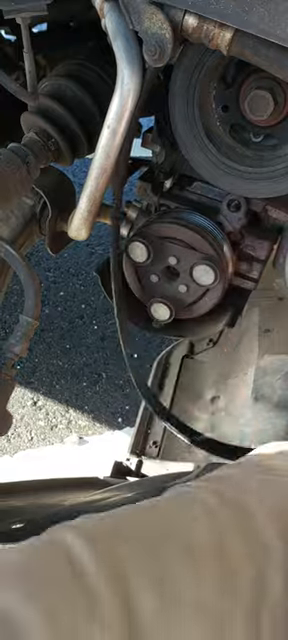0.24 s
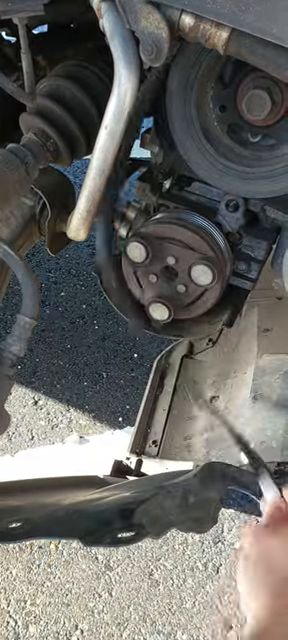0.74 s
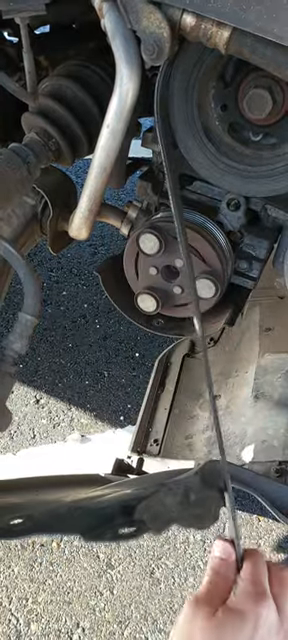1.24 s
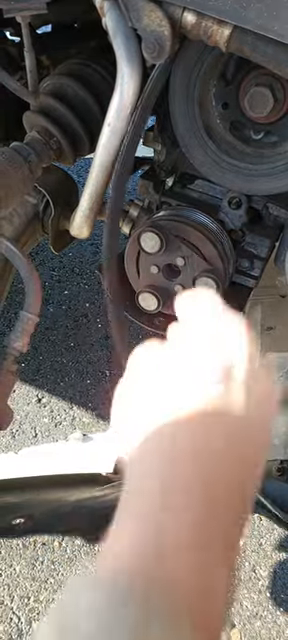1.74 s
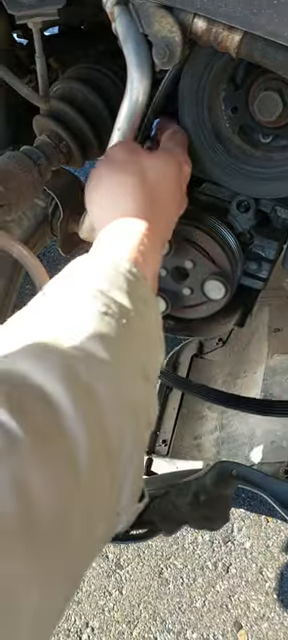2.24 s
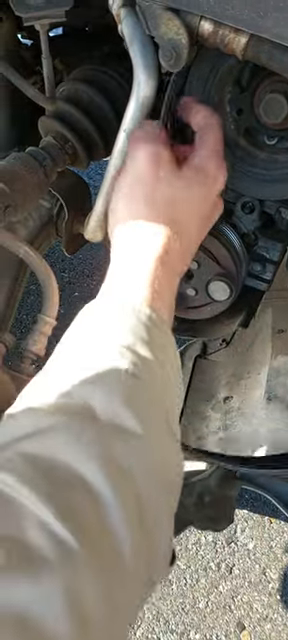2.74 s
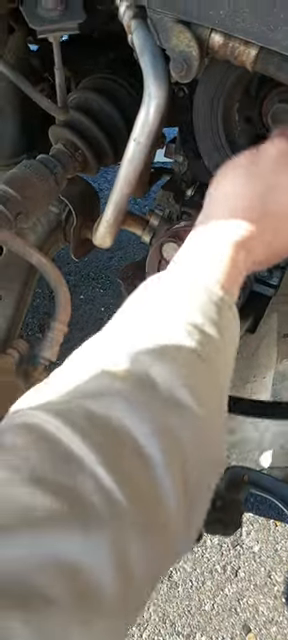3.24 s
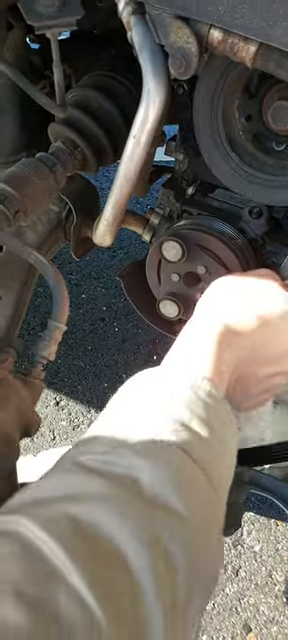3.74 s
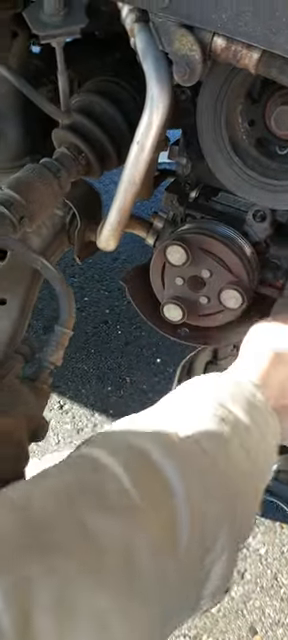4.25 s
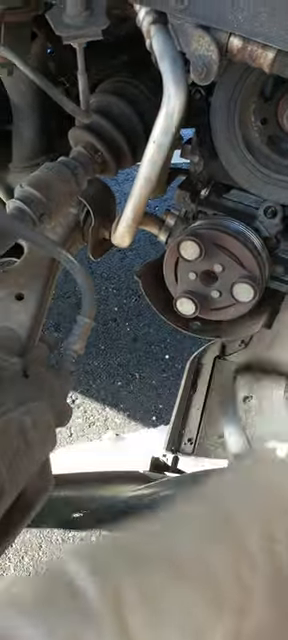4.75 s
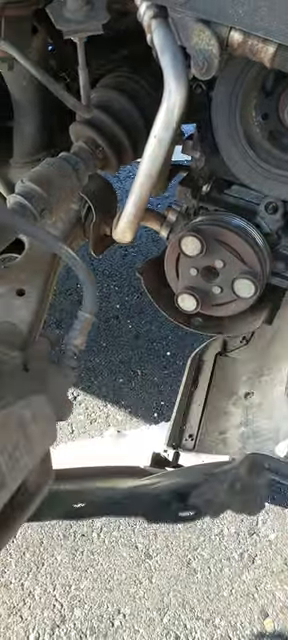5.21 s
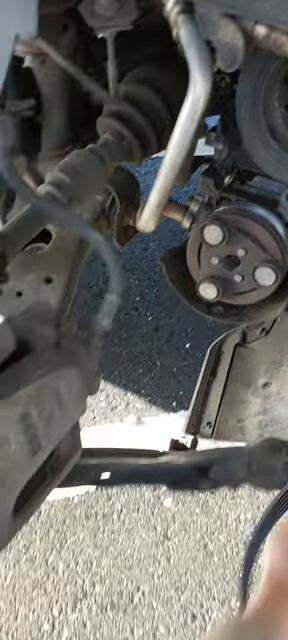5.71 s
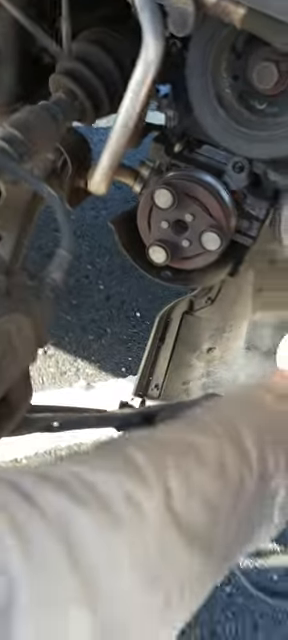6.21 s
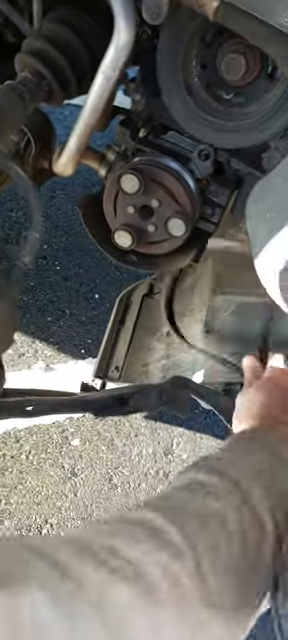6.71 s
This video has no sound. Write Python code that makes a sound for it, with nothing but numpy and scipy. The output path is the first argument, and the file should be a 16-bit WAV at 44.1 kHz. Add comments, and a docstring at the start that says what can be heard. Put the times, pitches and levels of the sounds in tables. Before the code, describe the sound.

Irregular handling noise, dry and close in open air: cloth brushing, rubber scuffing, boxy knocks and a few bright metal ticks. Early slaps come in small clusters, then lighter rustling, a strong thud near the middle, a busy rattling drag after five seconds, and a last pair of hard knocks. Faint air and a distant idling-like hum continue quietly underneath.

```python
"""A rubber drive belt is worked off its pulleys by hand, under a car parked outdoors.
The belt slaps, flaps, drags and scuffs on a loose plastic splash tray and clicks on the metal around it:
short bursts and uneven pushes set the tray and the metal ringing.
A sleeve rustles close to the microphone as coloured noise that comes and goes in strokes.
Behind it are a rumble, faint air and a low hum of unsteady tones, like an engine idling some way off."""
import sys
import numpy as np
from scipy import signal
from scipy.fft import rfft, irfft, next_fast_len
from scipy.io import wavfile
from scipy.ndimage import uniform_filter1d, map_coordinates

SR = 44100
rng = np.random.default_rng(int(sys.argv[2]) if len(sys.argv) > 2 else 0)


def unload_audio(sound):
    """Save the sound as a 16-bit wav file, at the path given as the first command line argument."""
    columns = np.transpose(np.atleast_2d(sound))
    # keep every value between -1 and 1, then stretch to whole-number steps
    steps = np.round(np.clip(columns, -1, 1) * 32767)
    wavfile.write(sys.argv[1], SR, steps.astype(np.int16))


N = 307369  # length in samples

# Notes the splash tray rings with: pitch_hz [Hz], relative_level_db [dB], time_to_fall_60_db_s [s]
TRAY_MODES = [(64.7, 1, 0.2), (81.3, 0, 0.097), (117.3, 2, 0.22), (147, 5.5, 0.13), (214.4, 2, 0.15),
              (258.8, 2, 0.15), (273, -2, 0.28), (310, 0.5, 0.2), (355.6, -4, 0.12), (413.5, -0.5, 0.19),
              (452.5, -2.5, 0.15), (516.6, -0.5, 0.13), (564.6, -10, 0.25), (672, -15, 0.27),
              (760, -8, 0.12)]
# Hard resonances of belt and brackets: pitch_hz [Hz], width_hz [Hz], relative_level_db [dB]
BRACKET_PEAKS = [(548, 117, 9), (828, 200, 5), (1093, 101, 3.5), (1332, 93, 2.5), (1672, 202, 1.5),
                 (1854, 110, 5.5), (2170, 256, -0.5), (2610, 85, 6.5), (2680, 386, -1), (3280, 186, -0.5),
                 (4500, 110, -23), (5340, 500, -7.5), (9700, 1100, -50)]
# Colour of a rubber snap: frequency_hz [Hz], relative_level_db [dB per Hz]
SNAP_COLOUR = [(1500, 7), (3500, 3.5), (5200, 4.5), (7200, -8.5), (9800, -1), (12000, -18), (16000, -46)]


def amp(db):
    """Turn decibels into a gain."""
    return 10 ** (np.asarray(db) / 20)


def unit(x):
    """Scale a sound to an rms level of 1."""
    return x / np.sqrt(np.mean(x ** 2) + 1e-20)


def peak_one(x):
    """Scale a sound to a peak of 1."""
    return x / (np.abs(x).max() + 1e-20)


def along(points, hz):
    """Read a curve of (Hz, value) points, with pitch on a log scale."""
    point_hz, values = np.transpose(points)
    return np.interp(np.log(hz + 1), np.log(point_hz), values)


def curves(rows):
    """Join the rows of a timed table into one value per sample for each column after the time."""
    times, *columns = np.transpose(rows)
    return [np.interp(np.arange(N) / SR, times, column) for column in columns]


def wobble(rate):
    """Draw a smooth random curve through `rate` random points a second."""
    knots = rng.standard_normal(int(N * rate / SR) + 4)
    grid = np.arange(0, len(knots), .125)
    smooth = map_coordinates(knots, [grid])
    return np.interp(np.arange(N) * (rate / SR), grid, smooth)


def filtered(x, response):
    """Multiply the spectrum of a sound by a response, which may also shift phase."""
    size = x.shape[-1]
    padded = next_fast_len(size + 4096, real=True)
    hz = np.fft.rfftfreq(padded, 1 / SR).astype(np.float32)
    gain = np.asarray(response(hz), np.complex64)
    return irfft(rfft(x.astype(np.float32), padded) * gain, padded)[..., :size]


def resonate(x, peaks):
    """Shake a bank of (Hz, width, dB) resonances with a sound."""
    # neighbours take opposite signs
    bank = [(float(c), float(w), (-1) ** k * float(amp(db))) for k, (c, w, db) in enumerate(peaks)]
    return filtered(x, lambda f: sum(g * 1j * w * f / (c * c - f * f + 1j * w * f) for c, w, g in bank))


def pair(size):
    """Make white noise for both microphone ports, alike in the bass and nearly unrelated in the treble."""
    # Likeness of the ports: frequency_hz [Hz], likeness [1 = the same, 0 = unrelated]
    likeness = [(60, 0.8), (300, 0.7), (700, 0.25), (2000, -0.16), (6000, -0.12), (14000, 0)]

    def shares(hz):
        angle = np.arccos(np.clip(along(likeness, hz), -1, 1)) / 2
        return np.array([np.cos(angle), np.sin(angle)])

    mid, side = filtered(rng.standard_normal((2, size)), shares)
    return np.array([mid + side, mid - side])


def rush(spectrum):
    """Make coloured stereo noise with an rms level of 1."""
    return unit(filtered(pair(N), lambda hz: amp(along(spectrum, hz))))


def fade(t, t60):
    """Die away smoothly, by 60 dB in t60 seconds."""
    return np.exp(-np.log(1000) * t / np.maximum(t60, 1e-3))


def favour(hz, centre_hz, octaves):
    """A contact excites most strongly the modes near its own pitch."""
    return np.exp(-.5 * (np.log2(hz / centre_hz) / octaves) ** 2)


def excited(peaks, centre_hz, octaves, rest):
    """Reweight resonances for one contact; far ones keep a small share."""
    return [(hz, width, db + 20 * np.log10(favour(hz, centre_hz, octaves) + abs(rest)))
            for hz, width, db in peaks]


def tray_peaks():
    """Give the tray's modes as (Hz, width, dB) resonances; a longer ring means a narrower peak."""
    return [(hz, np.log(1000) / np.pi / t60, db) for hz, db, t60 in TRAY_MODES]


def ring(modes, centre_hz, octaves, attack, port_spread):
    """One blow sets fading sine tones going, each at a slightly new strength."""
    t = np.arange(SR // 4, dtype=np.float32) / SR
    hz, db, t60 = np.transpose(modes)[:, :, None]
    gain = amp(db + 2 * rng.standard_normal(hz.shape)) * favour(hz, centre_hz, octaves)
    phase = 2 * np.pi * rng.random(hz.shape)
    phase = phase + port_spread * rng.standard_normal((2, *hz.shape))  # the ports differ
    gain, turn, damping, phase = map(np.float32, (gain, 2 * np.pi * hz, np.log(1000) / t60, phase))
    tones = gain * np.exp(-damping * t) * np.sin(turn * t + phase)
    return peak_one(np.sum(tones, axis=1) * (1 - np.exp(-t / attack)))


def slips(rate, scatter, spread_db):
    """Stick and slip: pushes of uneven size at an uneven rate, about `rate` a second."""
    turns = np.cumsum(rate * np.exp(scatter * wobble(rate))) / SR
    pushes = np.diff(np.floor(turns), prepend=0)  # one push each time the count goes up
    return pushes * amp(spread_db * wobble(rate))


def patchy(x, depth_db):
    """Vary the gain in slow random patches over time and frequency."""
    z = signal.stft(x, nperseg=512)[2]
    field = uniform_filter1d(rng.standard_normal(z.shape[1:]), size=9, axis=0)
    field = uniform_filter1d(field, size=9, axis=1)
    return unit(signal.istft(z * amp(depth_db * unit(field)), nperseg=512)[1][:, :N])


def add(track, s, sound):
    """Mix a sound into the track at time s."""
    part = track[:, max(round(s * SR), 0):][:, :sound.shape[1]]
    part += sound[:, :part.shape[1]]


def outdoors():
    """Sine tones make a slightly unsteady hum that swells with the distant rumble; noise makes faint air."""
    # Hum tones: pitch_hz [Hz], rms_level_db [dB before flutter and swell]
    hum_tones = [(66, -49.5), (102.3, -50), (111, -53.5), (172.3, -46), (204.6, -64), (279.9, -52),
                 (344.5, -64)]
    # Colour of the rumble: frequency_hz [Hz], relative_level_db [dB per Hz]
    rumble_colour = [(20, -16.5), (55, -0.5), (110, 0.5), (170, -3), (300, -15.5), (450, -23.5), (650, -42),
                     (1500, -58)]
    # Colour of the air: frequency_hz [Hz], relative_level_db [dB per Hz]
    air_colour = [(300, 5), (700, 5.5), (1400, 4.5), (2900, 5), (4000, -13), (8000, -4.5), (16000, -15)]
    # Rise and fall of the rumble: time_s [s], level_db [dB before lift and wobble]
    rumble_levels = [(0.0, -44), (0.7, -42.5), (1.38, -48), (4.13, -38.5), (4.27, -40.5), (6.62, -42.5),
                     (6.97, -38.5)]
    phase_waver, flutter_db = 0.63, 2  # unsteadiness of each tone: radians, dB
    rumble_lift_db, air_db = 1, -66.5
    hum_follows = 0.56  # share of the rumble's swell, in dB, that the hum follows

    t = np.arange(N) / SR
    rumble_db, = curves(rumble_levels)
    hum = np.zeros((2, N))
    for hz, db in hum_tones:
        phase = 2 * np.pi * hz * t + phase_waver * wobble(7)
        phase = phase + .3 * rng.standard_normal((2, 1))  # the ports differ
        hum += amp(db + flutter_db * wobble(4)) * np.sqrt(2) * np.sin(phase)
    swell = amp(hum_follows * (rumble_db - rumble_db.mean()))
    rumble = amp(rumble_db + rumble_lift_db + wobble(2.99)) * rush(rumble_colour)
    return swell * hum + rumble + amp(air_db) * rush(air_colour)


def stroke_gains():
    """Gains of rub and hiss: most strokes swell and sink; the last is still swelling when it is let go."""
    # Strokes of sleeve and belt: start_s [s], swells_until_s [s; after end_s in the last row],
    # end_s [s], rub_db and hiss_db [relative dB at the top of the swell]
    strokes = [(0.474, 0.585, 0.81, -43.5, -53), (0.87, 0.89, 1.13, -57.5, -61),
               (1.559, 1.737, 2.01, -51.5, -57.5), (2.29, 2.38, 2.43, -61.5, -58),
               (2.568, 2.629, 2.8, -87, -63), (2.87, 2.923, 3.12, -61, -60.5),
               (3.155, 3.198, 3.35, -60, -60), (3.423, 3.521, 3.72, -50.5, -55.5),
               (3.757, 3.908, 4.45, -52, -64), (4.108, 4.272, 4.76, -81, -62),
               (4.46, 4.835, 4.865, -47.5, -56.5), (4.987, 5.016, 5.17, -44, -60),
               (5.226, 5.278, 5.38, -39, -58), (5.436, 5.64, 5.67, -50, -57),
               (5.693, 5.734, 5.82, -51, -57.5), (5.896, 5.916, 6.04, -56.5, -53),
               (6.188, 6.215, 6.76, -58, -62.5), (6.499, 6.644, 6.89, -44.5, -57),
               (6.839, 6.895, 6.87, -43, -59.5)]
    grip_s, release_s = 0.077, 0.16  # times over 60 dB: quick to come in, slower to die away
    rub_sag_db, hiss_sag_db = 13, 8  # how far the ends of a stroke lie below the top of its swell
    rest_rub_db, rest_hiss_db = -70, -80.5  # cloth still stirs between strokes

    t = np.arange(N) / SR
    rub_power = np.full(N, amp(rest_rub_db) ** 2)
    hiss_power = np.full(N, amp(rest_hiss_db) ** 2)
    for start, swells_until, end, rub_db, hiss_db in strokes:
        on = (t > start - grip_s) & (t < end + release_s)
        coming_in = fade(np.maximum(start - t[on], 0), grip_s)
        dying_away = fade(np.maximum(t[on] - end, 0), release_s)
        contact = coming_in * dying_away
        sag = np.interp(t[on], [start, swells_until, end], [1, 0, 1])
        rub_power[on] += (contact * amp(rub_db - rub_sag_db * sag)) ** 2
        hiss_power[on] += (contact * amp(hiss_db - hiss_sag_db * sag)) ** 2
    return np.sqrt(rub_power), np.sqrt(hiss_power)


def sliding():
    """Cloth and rubber rub in grainy strokes under a fluttering hiss; the belt catches, the sleeve crackles."""
    # Colour of the rub: frequency_hz [Hz], relative_level_db [dB per Hz]
    rub_colour = [(150, -3.5), (430, 11), (700, -9.5), (1080, -3.5), (1550, -10.5), (1880, -3), (2300, -5),
                  (2900, -7), (3900, -15.5), (7000, -35)]
    # Colour of the hiss: frequency_hz [Hz], relative_level_db [dB per Hz]
    hiss_colour = [(1500, 4), (3800, 3.5), (5300, 2), (7200, -0.5), (9500, 0.5), (12000, -3), (16000, -7)]
    catch_db, crackle_db = -12, -11.5  # catches against the rub, crackles against the hiss

    rub_gain, hiss_gain = stroke_gains()
    pressure, flutter = amp(1.5 * wobble(35)), amp(1.3 * wobble(22))
    grain = unit(slips(rate=350, scatter=.7, spread_db=3)) + pair(N)
    catches = unit(slips(rate=7, scatter=.7, spread_db=3))  # tiny catches of the belt
    folds = slips(rate=12, scatter=.7, spread_db=4)  # folds of the sleeve
    rub = rush(rub_colour) + amp(-5.5) * unit(resonate(grain, BRACKET_PEAKS))  # part rings in the brackets
    caught = unit(resonate(catches, tray_peaks() + BRACKET_PEAKS))
    rub = 1.225 * patchy(rub, depth_db=2.5) + amp(catch_db) * caught
    # each fold swells the hiss, then dies away by 60 dB in 0.029 s
    crackle = unit(signal.lfilter([1], [1, -fade(1 / SR, 0.029)], folds))
    # the colour of the hiss shifts as the cloth moves
    hiss = patchy(rush(hiss_colour), depth_db=3) * (flutter + amp(crackle_db) * crackle)
    return pressure * (amp(3) * rub_gain * rub + amp(2) * hiss_gain * hiss)


def clicks():
    """Hard taps on metal: a short crack of noise and a quickly damped ring."""
    # Notes of the pulley metal: pitch_hz [Hz], relative_level_db [dB], time_to_fall_60_db_s [s]
    metal_modes = [(1389, -10, .04), (1965, -7, .04), (2290, -6, .035), (2480, -4, .035), (2900, -6, .03),
                   (3270, -3, .03), (3461, 0, .035), (3575, -2, .04), (4430, -17, .04), (5060, -15, .04),
                   (5464, -19, .045)]
    # Taps on metal: start_s [s], note_peak_db [dB], brightness_centre_hz [Hz]
    taps = [(0.844, -29, 1930), (0.8779, -17.5, 3670), (5.6275, -15, 2350), (6.566, -28, 2280)]
    # Colour of a metal crack: frequency_hz [Hz], relative_level_db [dB per Hz]
    crack_colour = [(400, -8), (1100, -4), (2300, 2.5), (3300, -1.5), (4000, -9.5), (5300, -3), (7000, -23),
                    (10000, -15), (15000, -55)]

    out, t = np.zeros((2, N)), np.arange(SR // 4) / SR
    for s, db, hz in taps:
        burst = pair(len(t)) * (fade(t, 0.02) + amp(-1.5) * fade(t, 0.094))
        crack = filtered(burst, lambda f: amp(along(crack_colour, f)))
        note = ring(metal_modes, hz, octaves=0.31, attack=0.00035, port_spread=0.63)
        add(out, s, amp(db) * note + amp(db - 1.0) * peak_one(crack))
    return out


def scuffs():
    """Short grainy scuffs of the belt, and one faint, high flick of the sleeve, ring and rasp."""
    # Scuffs, with the sleeve's flick at 6000 Hz: middle_s [s], relative_level_db [dB],
    # length_s [s from the middle until the gain falls to 0.14], pitch_hz [Hz]
    scuff_list = [(3.606, -47.5, 0.023, 1890), (4.14, -34, 0.013, 325), (4.623, -42, 0.041, 402),
                  (4.809, -35.5, 0.0096, 424), (4.854, -37, .017, 1800), (5.104, -29, 0.02, 2800),
                  (5.145, -25, .011, 2000), (5.169, -35, .013, 2180), (5.605, -33.5, 0.035, 442),
                  (5.732, -40.5, .069, 557), (5.736, -37.5, 0.031, 2300), (6.246, -40.5, 0.016, 414),
                  (6.376, -59, 0.0072, 6000), (6.711, -43.5, 0.019, 2460), (6.913, -45, .037, 397)]

    out, t = np.zeros((2, N)), np.arange(SR // 4) / SR
    force = unit(slips(rate=600, scatter=.6, spread_db=3.5)) + 1.0 * pair(N)
    for s, db, length, hz in scuff_list:
        grains = force[:, rng.integers(N - len(t)):][:, :len(t)]
        peaks = excited(tray_peaks() + BRACKET_PEAKS, hz, octaves=0.45, rest=0.026)
        body = unit(resonate(grains, peaks))
        rasp = unit(filtered(grains, lambda f: amp(along(SNAP_COLOUR, f))))
        sound = body + amp(-7.5) * hz / 2500 * rasp  # higher scuffs rasp more
        swell = np.exp(-2 * ((t - t.mean()) / length) ** 2)
        add(out, s - t.mean(), amp(db - 1.0) * sound * swell)
    return out


def drag():
    """The belt judders over the tray in stick and slip, shaking it and the brackets."""
    # Dragging over the tray: time_s [s], judder_db and rasp_db [relative dB]
    drag_levels = [(5.2, -29, -48), (5.28, -25, -47), (5.36, -22, -43.5), (5.425, -32.5, -74)]

    judder_db, rasp_db = curves(drag_levels)
    t = np.arange(N) / SR
    touching = 1. * ((t > drag_levels[0][0]) & (t < drag_levels[-1][0]))
    touching = uniform_filter1d(touching, size=300)  # soften the start and end
    force = unit(slips(rate=110, scatter=.5, spread_db=2.5)) + .35 * pair(N)
    # higher tray notes gain 2 dB per octave
    tray = [(hz, width, db + 2 * np.log2(hz / 300)) for hz, width, db in tray_peaks()]
    judder = unit(resonate(force, tray))
    brackets = excited(BRACKET_PEAKS, 790, octaves=0.63, rest=0.11)
    rasp = unit(resonate(force * amp(3 * wobble(45)), brackets))
    return touching * (amp(judder_db - 4.0) * judder + amp(rasp_db + 7) * rasp)


def thumps():
    """Low thumps of the tray, most under the hardest slaps, ring its lower notes; it springs back after each."""
    # Low thumps: start_s [s], relative_level_db [dB], pitch_hz [Hz]
    thump_list = [(0.566, -16.5, 130), (0.763, -28, 83.5), (1.015, -30, 130), (1.764, -14.5, 92.6),
                  (2.774, -23.5, 110), (3.557, -26.5, 79.5), (3.914, -8.5, 79), (3.918, -18, 214.6),
                  (4.132, -13, 65.5), (5.277, -24, 85), (5.336, -18.5, 69), (5.639, -18.5, 135),
                  (5.923, -28.5, 123.2), (6.595, -14.5, 84)]
    rebound_s, rebound_db, rebound_pitch = 0.0231, -5, 0.83  # delay, level trim, share of the pitch

    out = np.zeros((2, N))
    for s, db, hz in thump_list:
        thump, rebound = [ring(TRAY_MODES, pitch, octaves=0.45, attack=0.0041, port_spread=0.38)
                          for pitch in (hz, hz * rebound_pitch)]
        add(out, s, amp(db - 2) * thump)
        add(out, s + rebound_s, amp(db + 0.5 + rebound_db) * rebound)
    return out


def knocks():
    """Each slap snaps rubber, clacks brackets and sounds a hollow tray note; then the belt flaps to rest."""
    # Knocks of the belt: start_s [s], clack_db [relative dB], clack_pitch_hz [Hz], tray_db [relative dB],
    # tray_pitch_hz [Hz], snap_db [relative dB], settling_time_s [s]
    knock_list = [(0.021, -35.5, 778, -36, 536, -43.5, .055), (0.378, -39.5, 735, -35.5, 535, -53, 0.07),
                  (0.464, -28.5, 700, -36.5, 430, -50, .053), (0.514, -42, 1450, -33, 290, -54, .045),
                  (0.55, -19.5, 1750, -17, 398, -48, 0.13), (0.765, -44, 1560, -31.5, 435, -54, 0.025),
                  (0.947, -38.5, 1700, -41.5, 283, -40, .065), (0.976, -36.5, 2570, -39, 285, -60, 0.039),
                  (1.009, -35, 797, -28, 312, -56, 0.078), (1.676, -37, 816, -31, 320, -58, 0.053),
                  (1.698, -35.5, 1170, -33.5, 374, -51, 0.061), (1.744, -21, 744, -29, 516, -28, 0.079),
                  (1.758, -16, 1170, -19.5, 480, -23, 0.028), (1.861, -41.5, 931, -39.5, 283, -43.5, 0.091),
                  (1.903, -41, 816, -40, 297, -59, .028), (2.407, -47, 2760, -70, 291, -48, 0.068),
                  (2.467, -42.5, 900, -65, 283, -61, .02), (2.761, -31, 800, -28.5, 390, -41.5, .032),
                  (2.866, -33.5, 676, -34.5, 310, -70, 0.055), (3.505, -34.5, 780, -31.5, 281, -58, 0.04),
                  (3.553, -29, 730, -24.5, 403, -78, 0.052), (3.82, -20, 687, -20, 510, -59, .028),
                  (3.909, -13, 1450, -20, 356, -33, 0.024), (3.951, -31, 720, -24.5, 334, -62, 0.032),
                  (4.035, -39, 703, -37, 427, -45, .027), (4.101, -36, 1120, -43, 288, -50, 0.02),
                  (4.161, -24, 690, -24.5, 403, -61, 0.036), (5.135, -21.5, 1400, -38, 428, -29, 0.11),
                  (5.202, -24.5, 1740, -23, 295, -40, 0.092), (5.224, -22, 1050, -30, 277, -55, .069),
                  (5.258, -32, 931, -27.5, 390, -50, .05), (5.306, -28.5, 1020, -28, 417, -55, 0.052),
                  (5.348, -29.5, 1790, -24, 393, -55, 0.05), (5.628, -26.5, 2470, -25.5, 340, -27, 0.085),
                  (5.897, -44, 2680, -30, 291, -43.5, 0.07), (6.595, -17, 900, -14, 302, -23, 0.044),
                  (6.654, -19.5, 910, -23.5, 368, -53, .032), (6.686, -34.5, 2140, -29, 283, -33, 0.042),
                  (6.873, -28.5, 908, -33.5, 306, -41, 0.014)]
    flap_s, flap_scatter = .013, .2  # typical seconds between flaps, spread of that time
    flap_lasts = 3.46  # flapping dies away by 60 dB in this many settling times
    flap_db, flap_clack_db = 0.5, -21  # trims of tray and clack: flaps barely stir the brackets
    flap_pitch = 0.79  # share of the first note's pitch

    out, t = np.zeros((2, N)), np.arange(SR // 5) / SR
    for s, clack_db, clack_hz, tray_db, tray_hz, snap_db, settle in knock_list:
        # a hard first touch, the belt settling, and a faint echo between car and ground
        decay = fade(t, 0.0048) + amp(-2) * fade(t, settle) + amp(-21) * fade(t, 0.13)
        burst = pair(len(t)) * (1 - np.exp(-t / 0.00047)) * decay
        brackets = excited(BRACKET_PEAKS, clack_hz, octaves=0.9, rest=0.054)
        clack = amp(clack_db + 4.5) * peak_one(resonate(burst, brackets))
        snap = rng.standard_normal((2, len(t))) * (1 - np.exp(-t / 0.00082)) * fade(t, 0.066)
        snap = filtered(snap, lambda hz: amp(along(SNAP_COLOUR, hz)))
        add(out, s, clack + amp(snap_db + 2.5) * peak_one(snap))
        damped = amp(tray_db + 6.5) * fade(t, 4 * settle)  # a belt that stops dead also damps the tray
        touch, flap = [
            damped * ring(TRAY_MODES, hz, octaves=0.6, attack=0.00043, port_spread=0.35)[:, :len(t)]
            for hz in (tray_hz, tray_hz * flap_pitch)]
        add(out, s, touch)
        gaps = flap_s * np.exp(flap_scatter * rng.standard_normal(size=4))
        for delay in np.cumsum(gaps):
            flap_sound = amp(flap_db) * flap + amp(flap_clack_db) * clack
            add(out, s + delay, fade(delay, flap_lasts * settle) * flap_sound)
    return out


def scene():
    """Mix all layers; sound from the tray reaches the two ports out of step."""
    # Timing between the ports: frequency_hz [Hz], left_lead_rad [radians]
    left_lead = [(250, 0), (450, 0.57), (550, 1.5), (650, 2.5), (1000, 4.5), (1700, 7), (3500, 11.5)]
    struck = knocks() + thumps() + drag() + scuffs()
    sides = np.array([[1], [-1]])  # left, right
    struck = filtered(struck, lambda hz: np.exp(.5j * along(left_lead, hz) * sides))
    return struck + clicks() + sliding() + outdoors()


def record(dry):
    """The two ports differ in colour; nothing is kept from 16000 Hz up."""
    # Colour difference of the ports: frequency_hz [Hz], left_minus_right_db [dB]
    tilt = [(60, -1), (200, 1), (600, 0.5), (1300, .5), (2400, -4), (4400, 4), (9500, 5), (13000, 13)]
    sides = np.array([[1], [-1]])  # left, right
    return filtered(dry, lambda hz: amp(.5 * along(tilt, hz) * sides) * (hz < 16000))


dry = scene()
out = record(dry)
unload_audio(out)
```